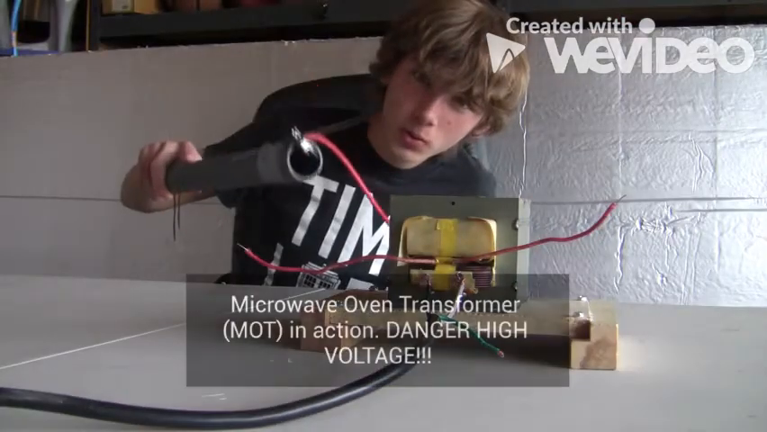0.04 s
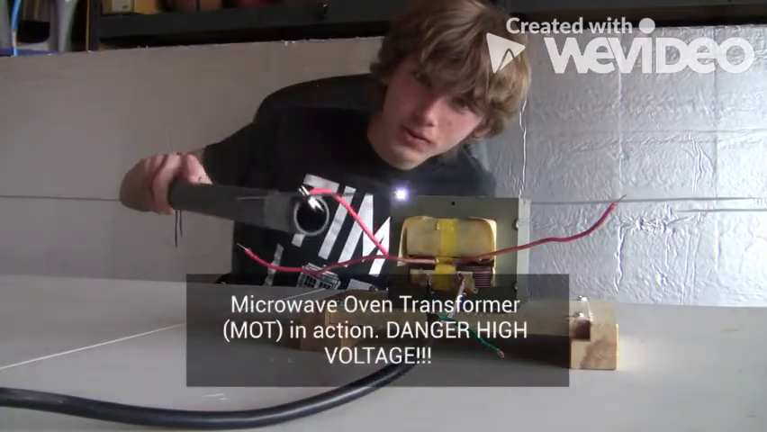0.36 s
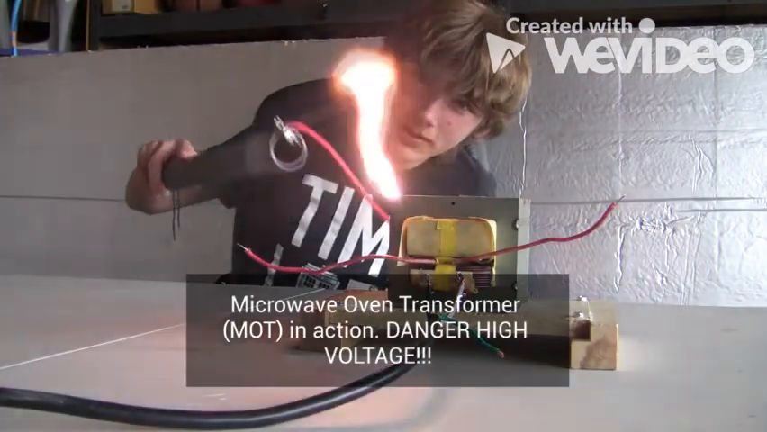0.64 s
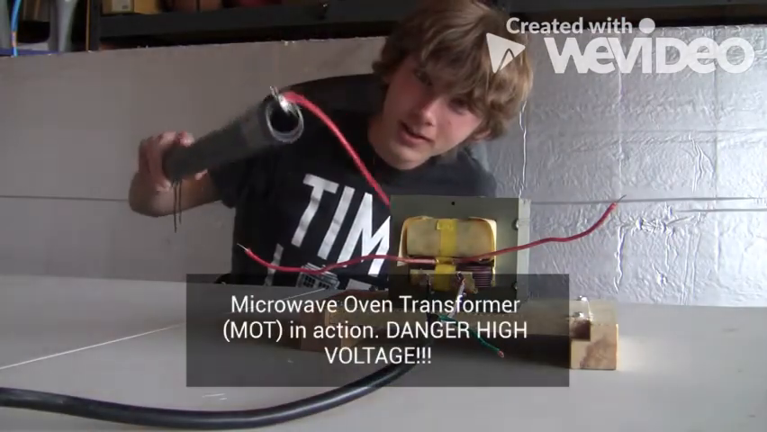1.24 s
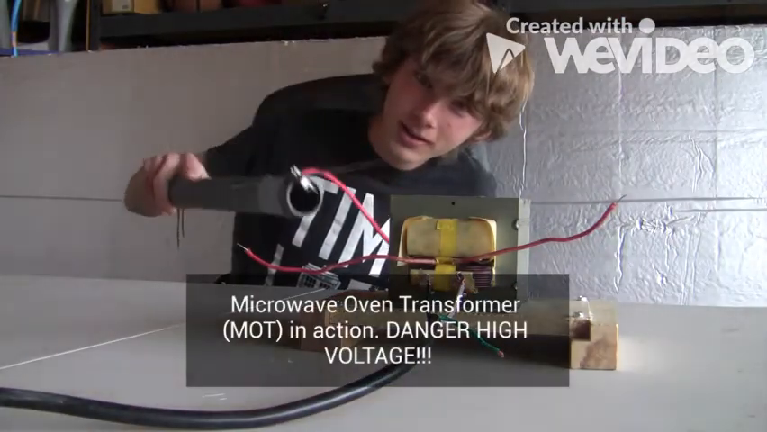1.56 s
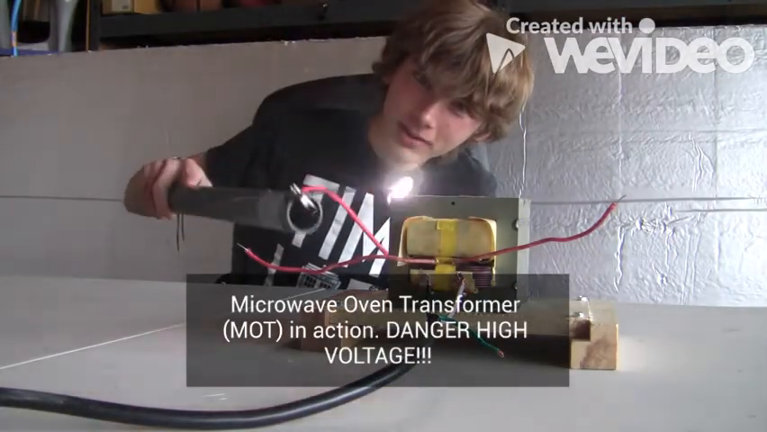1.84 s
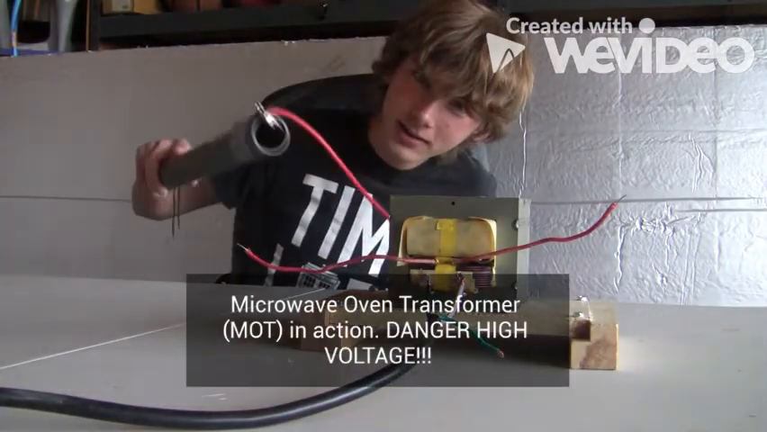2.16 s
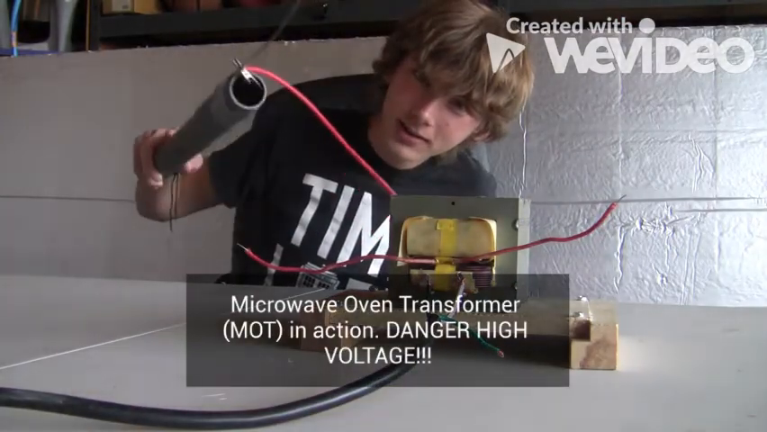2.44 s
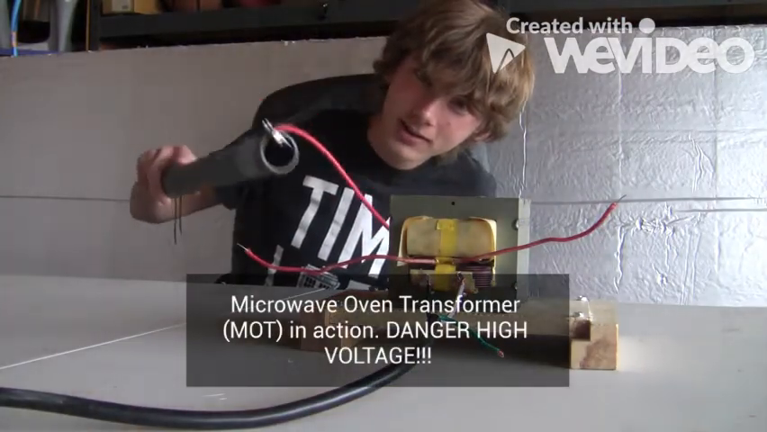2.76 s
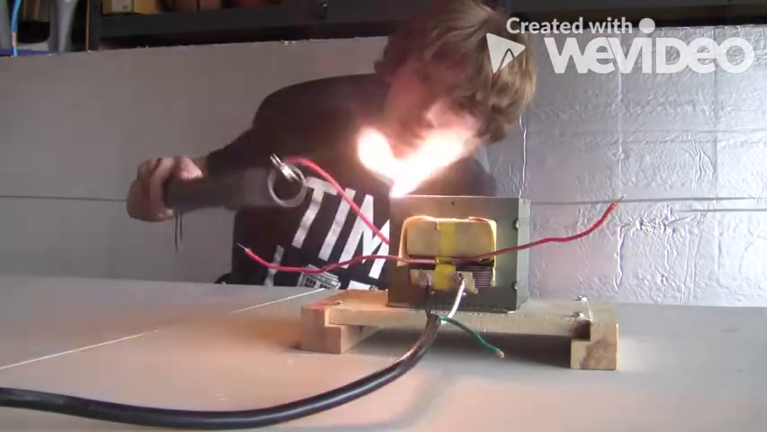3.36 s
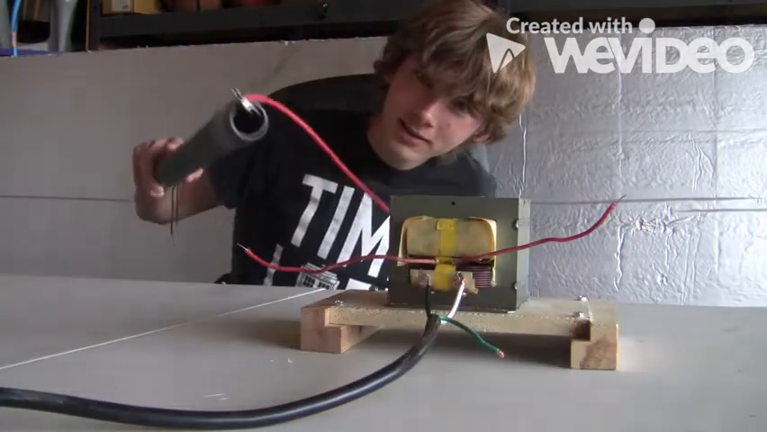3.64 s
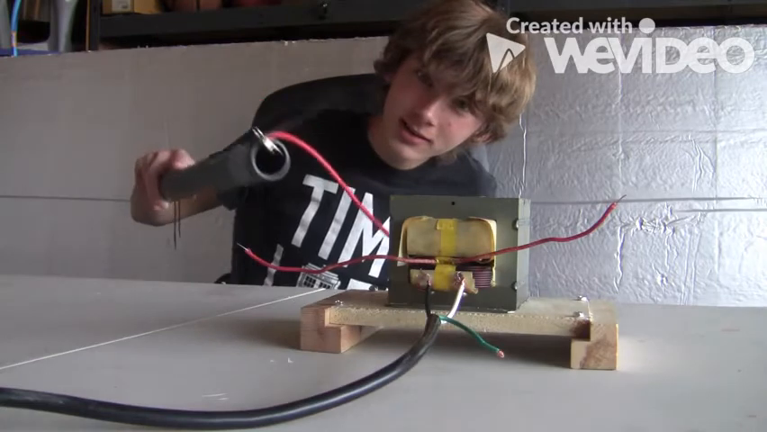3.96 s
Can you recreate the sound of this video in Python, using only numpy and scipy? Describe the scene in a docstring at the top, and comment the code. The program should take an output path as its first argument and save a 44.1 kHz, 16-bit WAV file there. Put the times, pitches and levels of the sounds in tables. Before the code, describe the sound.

An electric arc ticks close by at 0.3 seconds, then cracks and sizzles with a rapid buzz that grows duller and stops near 0.8. A second, shorter arc snaps and buzzes from 1.8 to 2.0 seconds. A third hisses and cracks sharply from 3.2 to 3.4. Each rings briefly in a small hard-walled room, and a faint electrical hum and quiet room noise fill the gaps.

```python
"""Three electric arcs, drawn from a mains transformer, burn close by in a small hard-walled room.
Each starts with a tick and a sizzle, cracks as the gap breaks down, then swells into a flame that
puffs on every half cycle of the mains, duller as it stretches, until it goes out. The electrodes
spark and hiss, the walls reflect the sound, and a faint hum and room air lie under it."""
import sys
import numpy as np
from scipy import signal
from scipy.fft import rfft, irfft
from scipy.io import wavfile
from scipy.ndimage import uniform_filter1d

SR = 44100
rng = np.random.default_rng(int(sys.argv[2]) if len(sys.argv) > 2 else 0)


def file_out(sig):
    """Save sig as 16-bit WAV at sys.argv[1]."""
    # one column per channel
    cols = np.atleast_2d(sig).T
    # limit, then scale
    lim = np.clip(cols, -1, 1)
    pcm = np.round(lim * 32767).astype(np.int16)
    wavfile.write(sys.argv[1], SR, pcm)


N = 176400

PUFF_HZ = 120  # two current zeros per mains cycle
SNAP_REBOUND, SNAP_LAG = 0.34, 4.02  # suction after a spark: share of the push, delay in pulse widths
# Breakdowns of the gap: time_s, level_db, width_ms
BREAKDOWNS = [(0.4297, 1, 0.045), (0.4397, -15, 0.093), (0.4474, -7.5, 0.058), (0.45, -17, 0.047),
              (.4563, -8, .06), (0.4929, -8, 0.1), (0.501, -12, 0.082), (0.5095, -5, 0.11),
              (0.514, -9, 0.051), (0.5267, -9, 0.13), (0.529, -14, 0.034), (.531, -13.5, .04),
              (0.5473, -5.5, 0.059), (.571, -1.5, 0.043), (.5722, 2.5, 0.048), (.575, -3.5, 0.078),
              (0.5854, -2.5, 0.16), (0.6188, -7, 0.23), (0.6342, -19, .3), (0.6527, -10.5, 0.17),
              (.668, -8.5, 0.15), (.6847, -4, 0.15), (0.7015, -6, 0.14), (.718, -10, 0.087),
              (.7346, -24, 0.23), (1.8377, -4, 0.037), (1.8389, 5, 0.044), (1.8551, 0.5, 0.055),
              (1.8573, 0.5, 0.046), (1.8635, -1, 0.078), (1.866, -7, 0.069), (1.8756, -8.5, 0.11),
              (1.8807, -26.5, 0.069), (1.8813, -4.5, 0.053), (1.8904, -3, 0.1), (1.8988, -7.5, 0.053),
              (1.9174, 1.5, 0.059), (3.2388, 6, .05), (3.2413, 0, 0.04), (3.2485, 3, 0.057),
              (3.2576, 5, 0.069), (3.274, 4.5, 0.068), (3.28, -6.5, 0.049), (3.2817, -14, 0.022),
              (3.2898, 2, 0.056), (3.3025, -8, .14), (3.31, -17, 0.042), (3.3603, 2, 0.053),
              (3.3814, -16, 0.16)]
# Spectral envelope of a spark: frequency_hz, gain_db
SPARK_COLOUR = [(30, -20), (150, -3.5), (500, 0.5), (1000, -1), (1600, 2), (2100, 0), (3000, 0.5),
                (4500, 3.5), (6300, 3.5), (9000, 12.5), (14000, 4)]


def flame(arc, jitter_s=0.00017, scatter_db=3.5, polarity_db=1.5):
    """Thermal contraction: the hot channel collapses at each current zero, more in one polarity."""
    # Spectral envelope of a puff: frequency_hz, gain_db
    puff_colour = [(40, -34), (90, -8), (130, -4.5), (240, -0.5), (420, 2), (900, 0.5), (2000, 2.5),
                   (5000, 6.5), (14000, -4)]
    start_s, end_s = arc[0][0], arc[-1][0]
    half_cycle = np.arange(round((end_s - start_s) * PUFF_HZ) + 1)
    jitter, scatter = rng.standard_normal((len(half_cycle), 2)).T
    times = start_s + half_cycle / PUFF_HZ + jitter_s * jitter
    db, width_ms, _, _ = along(arc, times)
    db = db + scatter_db * scatter + polarity_db * (-1) ** half_cycle
    return coloured(-pulses(zip(times, db, width_ms), rebound=0.24, lag=3.15), puff_colour)


def snaps():
    """Dielectric breakdown: each spark across the gap radiates a sharp pressure pulse."""
    return coloured(pulses(BREAKDOWNS, SNAP_REBOUND, SNAP_LAG), SPARK_COLOUR)


def crackle(arc, sparks_per_s=340, spread_db=6.5, narrowest_ms=0.038):
    """A Poisson process: small sparks strike independently at the electrodes."""
    t = np.arange(N) / SR
    chance, scatter, stretch = rng.random(N), rng.standard_normal(N), rng.uniform(1, 2.2, N)
    strikes = (chance < sparks_per_s / SR) & (t > arc[0][0]) & (t < arc[-1][0])
    _, _, db, _ = along(arc, t[strikes])
    db = db + spread_db * np.minimum(scatter[strikes], 1)
    sparks = zip(t[strikes], db, narrowest_ms * stretch[strikes])
    return coloured(pulses(sparks, SNAP_REBOUND, SNAP_LAG), SPARK_COLOUR)


def spits(gain_db=-24, decay_s=0.0008, sharp_ms=0.083):
    """Broadband transients: the sharpest breakdowns throw a short burst of bright hiss."""
    # Spectral envelope of a burst: frequency_hz, gain_db
    spit_colour = [(100, -31.5), (3000, -11), (7000, -2.5), (11000, -0.5), (14000, 4)]
    out = np.zeros(N)
    t = np.arange(SR // 50) / SR
    for time_s, db, width_ms in BREAKDOWNS:
        peak = amp(db + gain_db) * np.exp(-(width_ms / sharp_ms) ** 2 / 2)
        add(out, time_s, peak * np.exp(-t / decay_s) * rng.standard_normal(len(t)))
    return coloured(out, spit_colour)


def rasps(decay_s=0.0012):
    """Band-limited noise bursts: the stretched flame tears and catches again."""
    # Tears of the flame: start_s, level_db
    tears = [(0.6834, -18), (0.7028, -18), (.718, -25)]
    # Mid-pitched envelope of a tear: frequency_hz, gain_db
    rasp_colour = [(100, -35), (800, -17), (1200, 12), (1850, 13), (2400, 2), (5000, -17), (14000, -37)]
    out = np.zeros(N)
    t = np.arange(SR // 50) / SR
    for start_s, db in tears:
        add(out, start_s, amp(db) * np.exp(-t / decay_s) * rng.standard_normal(len(t)))
    return coloured(out, rasp_colour)


def sizzle(arc, depth=0.45):
    """Amplitude modulation: the hiss of the burning electrodes pulses with the current."""
    t = np.arange(N) / SR
    *_, db = along(arc, t)
    pulsing = 1 + depth * np.cos(2 * np.pi * PUFF_HZ * (t - arc[0][0]))
    return amp(db) * pulsing * burning(arc, t) * rng.standard_normal(N)


def fizz(arc, gain_db=-55.5):
    """Gated noise: a thin, very high hiss lasts as long as the arc burns."""
    # Spectral envelope of the hiss: frequency_hz, gain_db
    fizz_colour = [(100, -49), (8000, -28), (12000, 2), (14000, 2)]
    t = np.arange(N) / SR
    return amp(gain_db) * coloured(rng.standard_normal(N), fizz_colour) * burning(arc, t)


def ticks(decay_s=0.00053):
    """Onset transients: a dry tick and a brief hiss come just before each arc takes."""
    # Onsets of the arcs: start_s, tick_db, hiss_db, hiss_length_s
    onsets = [(.3428, -23.5, -39.5, 0.039), (1.753, -25.5, -52, 0.095), (3.1512, -30.5, -48, 0.11)]
    out = np.zeros(N)
    t = np.arange(SR // 4) / SR
    for start_s, tick_db, hiss_db, length_s in onsets:
        envelope = amp(tick_db) * np.exp(-t / decay_s) + amp(hiss_db) * np.exp(-(t / length_s) ** 4)
        add(out, start_s, envelope * rng.standard_normal(len(t)))
    return out


def reflections(x):
    """Specular reflection: delayed copies from the table top and walls join the direct sound."""
    # Early reflections: delay_s, gain, right_offset_s
    echoes = [(.00021, 0.11, .00004), (.00062, 0.047, -0.0098), (.0028, 0.067, -0.0063),
              (.0072, 0.037, -0.024), (.0091, 0.03, 0.013), (.0131, .09, -.00004), (.0164, 0.05, -0.014),
              (.0177, 0.052, 0.0057)]
    near = np.array([x, x])
    for delay_s, gain, right_offset_s in echoes:
        add(near[0], delay_s, gain * x)
        add(near[1], abs(delay_s + right_offset_s), gain * x)
    return near


def reverberation(x, onset_s=0.0034):
    """A diffuse field builds up, then decays exponentially, each band at its own rate."""
    # Reverberation time: frequency_hz, t60_s
    decay_times = [(100, 0.2), (240, 0.51), (500, 0.42), (1500, 0.46), (4000, 0.47), (8000, 0.34),
                   (14000, 0.29)]
    # Spectral envelope of the tail: frequency_hz, gain_db
    room_colour = [(50, -21), (120, -14), (170, 2), (250, -11.5), (400, -5.5), (600, -3), (1000, -5.5),
                   (1600, -7.5), (2500, -7.5), (5000, -7), (8000, -4), (14000, -14)]
    # Left-right likeness of the tail: frequency_hz, correlation
    room_likeness = [(100, 1), (1000, .96), (2000, 0.92), (4000, .55), (8000, 0.07), (14000, 0.21)]
    hz, t, noise = signal.stft(rng.standard_normal((2, SR)), SR, nperseg=256)
    decay_rate = np.log(1000) / read(decay_times, hz)[:, None]
    decay = np.exp(-decay_rate * t) * np.sqrt(2 * decay_rate / SR)  # unit energy in each band
    bands = paired(noise, room_likeness, hz) * amp(read(room_colour, hz))[:, None] * decay
    tail = flattened(signal.istft(bands, SR, nperseg=256)[1][:, :SR])
    t = np.arange(SR) / SR
    build_up = 1 - np.exp(-(t / onset_s) ** 2)
    fade_out = np.clip(4 - 5 * t, 0, 1)
    return signal.fftconvolve(x[None], tail * build_up * fade_out, axes=1)[:, :N]


def standing_waves(x):
    """Resonance: the low modes of the room ring on after the buzz."""
    # Room modes: pitch_hz, level_db, t60_s
    modes = [(241.5, -61.5, 0.48), (380.3, -68, 0.54)]
    t = np.arange(SR) / SR
    ring = sum(amp(db) * np.exp(-np.log(1000) * t / t60) * np.cos(2 * np.pi * hz * t)
               for hz, db, t60 in modes)
    return signal.fftconvolve(x, ring)[:N]


def hum(waver=0.078, drift_rad=0.44):
    """A line spectrum: the partials of an electrical hum waver in amplitude and phase."""
    # Partials of the hum: pitch_hz, level_db
    partials = [(59.2, -64.5), (145.3, -61), (296.1, -59.5), (360.7, -61), (414.5, -67.5), (479.1, -65),
                (958.2, -70), (1593, -74), (1943, -76.5), (2003, -78.5), (2358, -86), (2536, -76),
                (3122, -88), (3241, -80)]
    t = np.arange(N) / SR
    out = np.zeros(N)
    for hz, db in partials:
        envelope = np.sqrt(2) * amp(db) * (1 + waver * wander(rate_hz=3.2))
        phase = 2 * np.pi * (hz * t + rng.random()) + drift_rad * wander(rate_hz=2.9)
        out += envelope * np.sin(phase)
    return out


def room_air(level_db=-51, patch_db=0.33):
    """A continuous spectrum: quiet, low room noise whose bands flicker slightly."""
    # Spectral density of the air: frequency_hz, relative_db
    air_colour = [(12, -28), (20, -6), (95, -4.5), (136, 0), (195, -5.5), (294, -6.5), (650, -9.5),
                  (879, -13.5), (954, -15), (1040, -13), (1610, -18), (2700, -24), (3190, -24.5),
                  (3560, -26), (14000, -39.5)]
    # Left-right likeness of the air: frequency_hz, correlation
    air_likeness = [(60, 0.91), (180, 0.13), (550, -0.33), (1650, -0.36), (4970, -0.31), (15000, 0.2)]
    hz, _, noise = signal.stft(rng.standard_normal((2, N)), SR, nperseg=2048)
    patches = uniform_filter1d(rng.standard_normal(noise.shape[1:]), size=12, axis=0)
    patches = unit_rms(uniform_filter1d(patches, size=5, axis=1))
    gain = amp(read(air_colour, hz)[:, None] + patch_db * patches)
    air = signal.istft(paired(noise, air_likeness, hz) * gain, SR, nperseg=2048)[1][:, :N]
    return amp(level_db) * unit_rms(air)


def pulses(rows, rebound, lag, half_size=256):
    """Compression, then a longer, weaker rarefaction, for each row of time_s, level_db, width_ms."""
    out = np.zeros(N)
    for time_s, db, width_ms in rows:
        widths = np.arange(-half_size, half_size) / SR / (width_ms / 1000)
        push = np.exp(-widths ** 2 / 2)
        pull = rebound * np.exp(-((widths - lag) / 2) ** 2 / 2)
        add(out, time_s - half_size / SR, amp(db) * (push - pull))
    return out


def along(arc, t):
    """Linear interpolation of an arc's controls at times t."""
    times, *columns = np.transpose(arc)
    return [np.interp(t, times, column) for column in columns]


def burning(arc, t):
    """A gate, open from an arc's start until half a mains cycle after its end."""
    return (t > arc[0][0]) & (t < arc[-1][0] + 1 / PUFF_HZ)


def amp(db):
    """Decibels to amplitude ratio."""
    return 10 ** (np.asarray(db) / 20)


def unit_rms(x):
    """Normalisation to rms 1."""
    return x / np.sqrt(np.mean(x ** 2) + 1e-20)


def read(points, hz):
    """Interpolation on a log-frequency axis."""
    frequencies, values = np.transpose(points)
    return np.interp(np.log(hz + 1), np.log(frequencies + 1), values)


def add(mix, start_s, sound):
    """Superposition of a sound on the mix, in place."""
    part = mix[round(start_s * SR):][:len(sound)]
    part += sound[:len(part)]


def coloured(x, colour, size=4096):
    """Minimum-phase filtering by a spectral envelope."""
    log_gain = np.log(amp(read(colour, abs(np.fft.fftfreq(size, 1 / SR)))))
    response = np.exp(np.conj(signal.hilbert(log_gain)))
    taps = np.fft.ifft(response).real[:size // 2]
    return signal.fftconvolve(x, taps)[:N]


def wander(rate_hz):
    """Low-passed noise: a slow random fluctuation of rms 1."""
    low_pass = np.exp(-(np.fft.rfftfreq(N, 1 / SR) / rate_hz) ** 2)
    return unit_rms(irfft(rfft(rng.standard_normal(N)) * low_pass, N))


def paired(spectra, likeness, hz):
    """Partial coherence: mixes two independent short-time spectra to a given correlation."""
    left, other = spectra
    correlation = np.clip(read(likeness, hz), -1, 1)[:, None]
    return np.array([left, correlation * left + np.sqrt(1 - correlation ** 2) * other])


def flattened(tail, band_hz=30):
    """Spectral smoothing: evens out the narrow peaks and dips of a one-second tail."""
    spectrum = rfft(tail)
    power = (abs(spectrum) ** 2).mean(0)
    broad, narrow = uniform_filter1d(power, 4 * band_hz), uniform_filter1d(power, band_hz)
    return irfft(spectrum * np.sqrt(broad / narrow), SR)


def scene(left_db=0.66):
    """Superposition of the three arcs, the room and the background, slightly to the left."""
    # Course of each arc: time_s, puff_db, puff_width_ms, crackle_db, sizzle_db
    first_arc = [(.3917, -29, 0.06, -38, -46), (.425, -13.5, 0.057, -26, -32),
                 (.4665, -9, 0.18, -18, -42.5), (.53, -10.5, 0.13, -30, -32), (.59, -17.5, 0.27, -24, -49),
                 (.65, -11, 0.31, -49, -61), (.7, -14, 0.2, -32, -54), (.75, -12.5, 0.26, -28, -49)]
    second_arc = [(1.809, -34, 0.052, -41, -46), (1.835, -23, 0.075, -25.5, -37),
                  (1.875, -4.5, 0.052, -13, -25), (1.925, -15, 0.15, -34, -46),
                  (1.965, -12.5, 0.24, -35, -52), (1.995, -12, 0.23, -28, -48),
                  (2.0177, -20, 0.25, -42, -47)]
    third_arc = [(3.201, -30, 0.061, -42.5, -51), (3.2345, -23.5, 0.077, -27, -52),
                 (3.27, -15.5, 0.24, -27, -25), (3.32, -22, 0.18, -16, -46), (3.351, -15.5, 0.3, -42, -43),
                 (3.385, -19, 0.16, -24, -42.5), (3.4086, -10.5, 0.23, -40, -40.5)]
    # Spectral envelopes of the sizzle and of its stereo side signal: frequency_hz, gain_db
    sizzle_colour = [(100, -29), (700, -0.5), (1400, 3), (3000, 0), (5000, -1), (7000, -7), (10000, -2),
                     (14000, -7)]
    side_colour = [(100, -38), (2000, -24), (4000, -10.5), (8000, -3.5), (14000, -15.5)]
    arcs = first_arc, second_arc, third_arc
    buzz = sum(map(flame, arcs))
    cracks = snaps() + sum(map(crackle, arcs)) + spits()
    hiss = coloured(ticks() + sum(map(sizzle, arcs)), sizzle_colour) + sum(map(fizz, arcs))
    source = buzz + cracks + hiss + rasps()
    # Independent noise, opposite in sign left and right, widens the hiss.
    side = coloured(ticks() + sum(map(sizzle, arcs)) + spits(), side_colour)
    in_room = reflections(source) + reverberation(source) + standing_waves(source)
    return (in_room + np.array([side, -side]) + room_air() + hum()) * amp([[left_db], [-left_db]])


def record(dry, ceiling=0.91, cutoff_hz=14300):
    """Saturation: the loudest cracks overload the input, then a low-pass limits the band."""
    clipped = dry / (1 + (dry / ceiling) ** 8) ** (1 / 8)
    low_pass = signal.firwin(255, cutoff_hz, window=("kaiser", 8), fs=SR)
    return signal.oaconvolve(clipped, low_pass[None], "same")


dry = scene()
out = record(dry)
file_out(out)
```